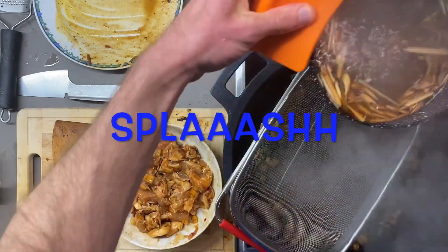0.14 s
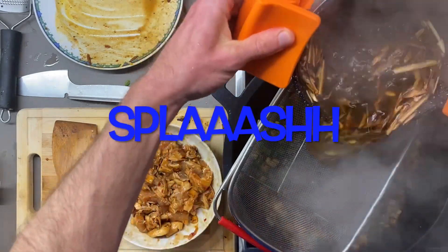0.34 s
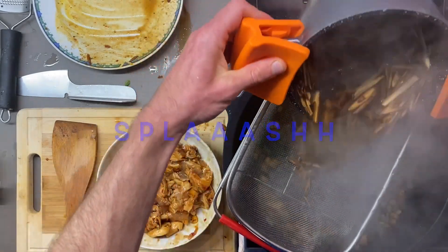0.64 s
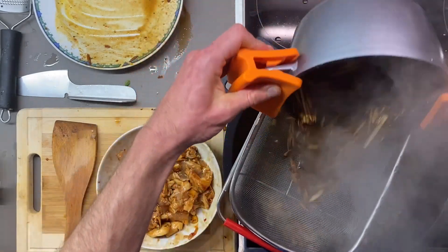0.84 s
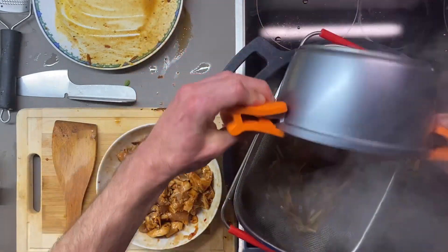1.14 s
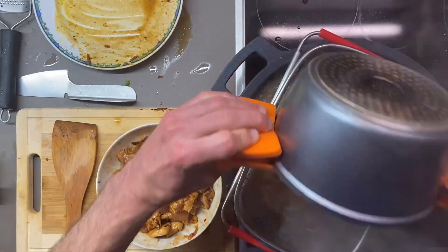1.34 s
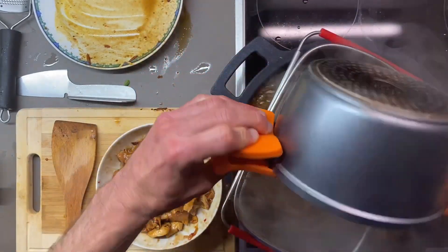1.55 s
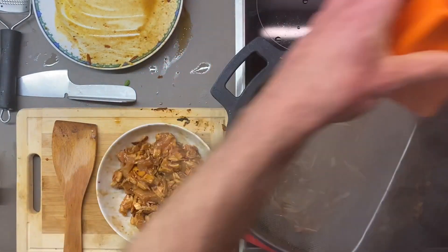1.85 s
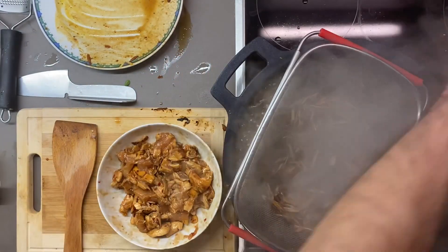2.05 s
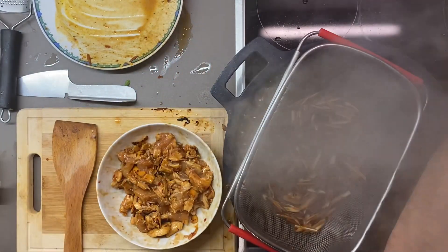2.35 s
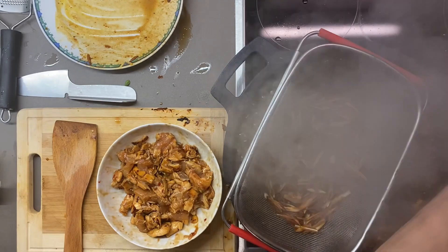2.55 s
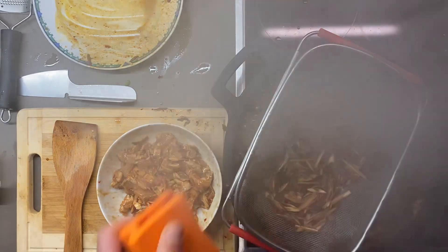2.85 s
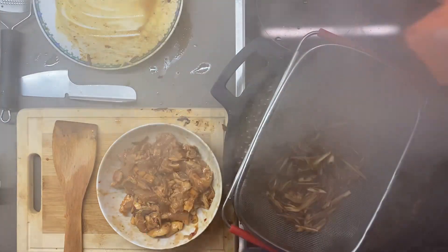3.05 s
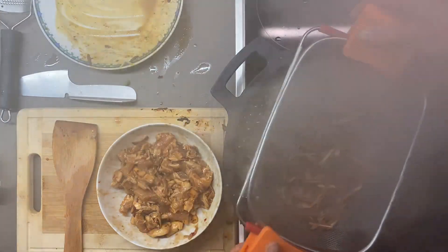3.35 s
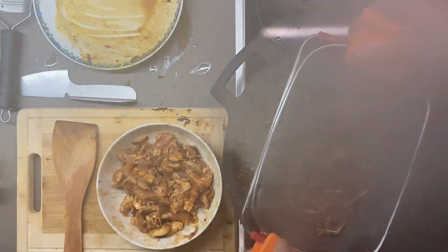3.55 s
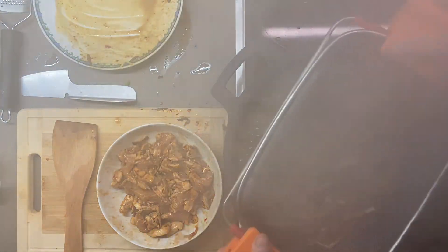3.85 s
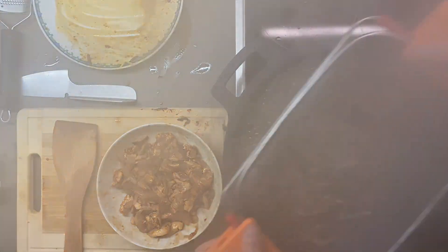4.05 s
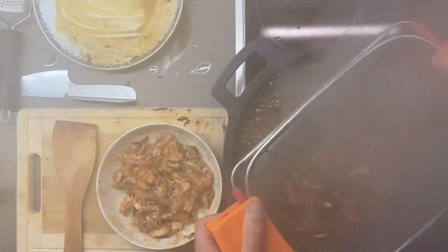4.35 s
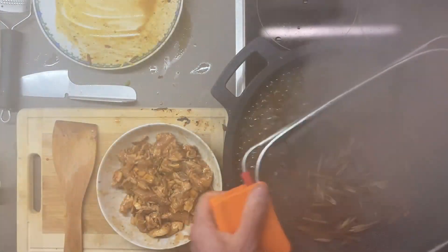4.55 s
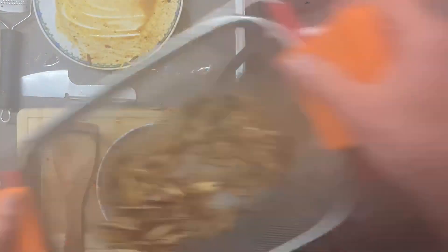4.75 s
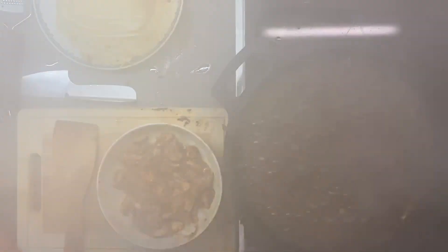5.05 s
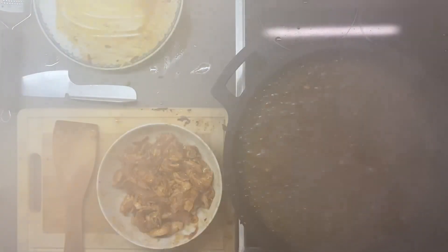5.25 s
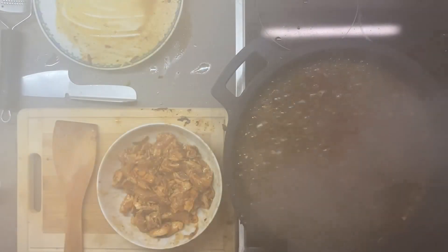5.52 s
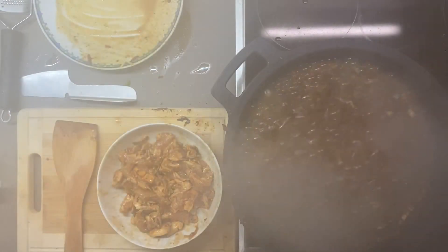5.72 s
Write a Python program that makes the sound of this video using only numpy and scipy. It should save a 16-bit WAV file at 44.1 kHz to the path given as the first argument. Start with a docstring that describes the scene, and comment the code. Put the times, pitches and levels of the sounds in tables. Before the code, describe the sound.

From 0 s a fierce, dense, bright sizzle fills the close stereo sound as broth is poured through a wire strainer onto very hot metal. Around 1-2 s it falls away rapidly, passing through a busy mid-pitched seethe of small bubbles into a darker rolling boil over a low rumble, with thin crackle from the rim and a faint steady hiss. At 2.4 s the empty pot lands on the worktop with a short dry crack and a dull boom that hardly rings. The boil slowly builds, with irregular round bubble pops and sharp spits; a soft low bump comes at 3.35 s. Around 5.2 s the draining strainer briefly livens the seething and clinks. At 5.5 s it hits the pot with a hollow clang and worktop thud, then bounces with bright mesh rattles around 5.65-5.8 s, ringing briefly over the continuing boil. Kitchen reflections are short.

```python
"""A fierce sizzle comes first, then dies down to a rolling boil: broth is poured through a wire strainer
into a very hot pan and fills it. The empty pot knocks onto the worktop; later the strainer is dropped
onto it, clattering and bouncing. Swarms of bubbles and patchy noise make the sizzle and the boil;
noise bursts and dying modes make the blows. The place is a kitchen; a two-port microphone is close by."""
import sys
import numpy as np
from scipy import signal
from scipy.fft import rfft, irfft
from scipy.io import wavfile
from scipy.ndimage import uniform_filter1d

SR = 44100
rng = np.random.default_rng(int(sys.argv[2]) if len(sys.argv) > 2 else 0)


def int16_out(signal):
    """Quantize to a 16-bit WAV file."""
    q = np.round(np.clip(np.atleast_2d(signal).T, -1, 1) * 32767)
    wavfile.write(sys.argv[1], SR, q.astype(np.int16))


N = 259352
HZ = np.fft.rfftfreq(N, 1 / SR)
TIME = np.arange(N) / SR

# Source levels in dB are relative: room, mix and microphone come after them.

# colouring of each source before the microphone: (frequency [Hz], gain [dB])
FIZZ_COLOUR = [(1500, -26), (3000, -2.5), (5000, 4.5), (6400, -2), (8000, 2), (10000, 0.5), (12000, -0.5),
               (14000, -1), (16000, -7.5)]
SPATTER_COLOUR = [(500, -23), (1000, -9), (1800, 0.5), (3000, 4.5), (4300, -1), (5500, 0), (6500, 2),
                  (10000, -65)]
BOIL_COLOUR = [(130, -22), (185, -20.5), (230, -5), (300, 0), (370, -3), (450, -7), (600, -3.5),
               (820, -6.5), (1100, -5.5), (1500, -10.5), (2100, -20), (3200, -20), (6000, -24.5)]
SEETHE_COLOUR = [(500, -6.5), (900, -10.5), (1400, -2), (2000, -5.5), (2500, -4), (3300, -35), (6000, -29)]
RUMBLE_COLOUR = [(15, -26), (30, -13), (48, -1.5), (70, -2), (95, 1), (125, -1), (175, -10.5), (300, -5.5),
                 (500, -18), (1500, -78)]
KNOCK_COLOUR = [(150, -7), (230, -2), (400, -4), (620, 1), (820, -4), (1000, -2), (1400, -10), (1750, -5),
                (2150, -7), (2350, -14), (2600, -12), (3500, -20), (4600, -16), (5300, -18), (6500, -26),
                (11000, -26), (15000, -33)]
# standing waves between hob, hood and wall, which colour the boil:
# (frequency [Hz], half width [Hz], gain [dB])
NOOK_RESONANCES = [(227, 8.4, 5), (257, 11, -7.5), (296, 3.6, 6.5), (345, 6.6, 6.5), (384, 21, -2),
                   (395, 8.4, 5.5), (467, 33, 6), (553, 19, -2.5), (652, 28, -6.5), (857, 123, 6),
                   (940, 33, -9), (1045, 82, 3)]
# the loudest single bubbles bursting: (time [s], level [dB], pitch [Hz])
BUBBLES = [(1.64, -33, 1070), (2.09, -27.5, 840), (2.661, -33, 890), (3.164, -28, 770), (3.408, -32, 700),
           (3.645, -30, 1040), (4.025, -25.5, 860), (4.092, -33, 1130), (4.527, -31, 890),
           (5.017, -30, 1010), (5.378, -24, 860), (5.416, -21, 1085)]
# the loudest drops spitting: (time [s], level [dB], pitch [Hz])
SPITS = [(2.511, -25, 11000), (2.7598, -28.5, 2220), (2.8345, -36, 9100), (2.9846, -39, 9690),
         (3.176, -30, 2150), (3.277, -27, 3070), (3.317, -32, 10300), (3.3478, -27.5, 10000),
         (3.697, -24.5, 1700), (3.7873, -35, 10600), (4.025, -44, 2600), (4.165, -31, 4800),
         (4.218, -31, 1460), (4.5445, -27, 1820), (5.0362, -29, 1460), (5.1437, -35, 10800)]
# lesser chance pops in the covered pan: (rate [1/s], level [dB], lowest pitch [Hz], highest pitch [Hz])
STRAY_POPS = [(6, -35, 520, 1200), (7, -38, 1200, 2500)]
# the strainer clinks, lands on the pot edge after edge and bounces; each contact favours one mode:
# (time [s], chatter level [dB], brightest frequency [Hz], width [octaves], chatter time [s],
#  hollowness [0-1], pot ring level [dB], strainer ring level [dB], favoured mode [Hz], favour [dB])
CLASHES = [(5.2276, -17, 4450, 0.96, 0.009, 0, -55, -20, 5400, 3),
           (5.237, -22.5, 4500, 1, 0.0083, 0, -55, -31, 2680, 14),
           (5.4746, -24.5, 4420, 0.45, 0.012, 0.5, -28.5, -48, 4005, 13),
           (5.493, -25.5, 1500, 1.7, 0.016, 0.4, -34, -55, 5244, -4),
           (5.514, -21, 3400, 1.2, 0.018, 0.9, -20.5, -42, 2932, 7),
           (5.531, -20, 5300, 1.2, 0.015, 0.4, -24.5, -42, 1077, 9),
           (5.646, -31.5, 1530, 1.6, 0.026, 0.4, -56, -58, 1077, 5),
           (5.6715, -18.5, 3830, 1.8, 0.0086, 0.1, -27, -28, 749, 15),
           (5.687, -21, 9000, 1.6, 0.0078, 0.3, -30, -25, 12400, 6),
           (5.706, -25.5, 3500, 1.1, 0.015, 0.6, -37, -50, 2885, 10),
           (5.785, -36, 3600, 1.3, 0.016, 0.5, -31.5, -48, 4005, 4),
           (5.803, -24.5, 4060, 0.89, 0.0095, 0.5, -29.5, -41, 4790, 2)]
# blows and soft bumps that shake the worktop; each spot favours one note of the board:
# (time [s], level [dB], first contact time [s], change per contact [dB], first gap [s], favoured note [Hz])
THUDS = [(2.4114, -33, 0.001, 6.5, 0.0027, 589), (2.4178, -15, 0.0049, -2.5, 0.0074, 124),
         (2.445, -19, 0.007, -3, 0.026, 90), (3.348, -19, 0.015, 3.5, 0.041, 52),
         (5.2388, -21.5, 0.0055, -2, 0.026, 90), (5.4913, -10.5, 0.0023, -1, 0.011, 399),
         (5.527, -26, 0.00058, -2, 0.0075, 397), (5.538, -14, 0.0053, -5, 0.0114, 90),
         (5.651, -18, 0.0033, 2.5, 0.0105, 90), (5.692, -24.5, 0.0026, 2.5, 0.011, 216),
         (5.7457, -21.5, 0.0048, -2, 0.0092, 215), (5.787, -31, 0.0042, 0, 0.011, 216)]
# modes of what rings: (frequency [Hz], level [dB], time to die by 60 dB [s])
POT_MODES = [(749, -9, .3), (1077, -8.5, .3), (1130, -13, .12), (1630, -8, .15), (1682, -8, .16),
             (1892, -3.5, .17), (2215, -8, .16), (2640, -7, .11), (2670, -8, .12), (2837, -5, .15),
             (2885, -5, .12), (2932, -5.5, .12), (3108, -5, .14), (4005, -6.5, .11), (4409, -7, .12),
             (4648, -6, .12), (4790, -6, .11), (4845, -8, .14), (5244, -1.5, .16), (5330, -6, .11),
             (5420, -6, .11), (5520, -5, .12), (5740, -9, .14)]
STRAINER_MODES = [(2165, -6, .08), (2385, -13, .3), (2465, -4, .07), (2680, -2.5, .06), (2945, -1.5, .06),
                  (3180, -7, .15), (3248, -10, .24), (3340, -2, .07), (3825, -7, .08), (4172, -13, .22),
                  (4950, -2, .08), (5200, -8, .1), (5265, -14, .25), (5400, -5, .07), (8050, -1, .07),
                  (8870, -3, .07), (11070, -6, .08), (12400, -4, .08)]
WORKTOP_MODES = [(52, -20, .28), (90, -5, .12), (104, -5, .1), (124, -2.5, .13), (146, -8, .08),
                 (170, -7, .08), (188, -8, .08), (216, -4, .17), (232, -7, .12), (285, -10, .06),
                 (351, -8.5, .12), (399, -7, .11), (444, -9, .13), (589, -16, .13), (675, -17, .12),
                 (942, -17, .12)]
# kitchen reverberation: (frequency [Hz], time to die by 60 dB [s])
KITCHEN_DECAY = [(100, 0.74), (500, 0.51), (2000, 0.35), (6000, 0.39), (15000, 0.26)]
# microphone, phase lead of the left port over the right: (frequency [Hz], phase [rad])
PORT_PHASE = [(300, 0), (700, -.45), (1050, 0), (2000, 0), (2700, .85), (4300, .85), (4900, .15),
              (5400, .35), (6000, 1.5), (6450, 2.7), (7200, 3.14), (7900, 3.35), (9800, 6.15), (11000, 6.4),
              (12800, 9.1), (13600, 9.42), (14300, 9.65), (15500, 12.3)]
# microphone, gain of the sound the ports do not share: (frequency [Hz], gain [dB])
UNSHARED_GAIN = [(60, -51), (130, -22.5), (290, -15), (640, -10.5), (1400, -6.5), (3000, -6.5), (5000, -8),
                 (6000, -9), (7000, -115), (9000, -45), (15000, -19)]
# microphone, left port over right: (frequency [Hz], difference [dB])
PORT_BALANCE = [(200, 0), (380, -0.96), (700, 2), (1300, 0.1), (2400, -1.4), (4400, -1), (8000, -0.1)]
# microphone response: (frequency [Hz], half width [Hz], gain [dB])
PORT_RESONANCES = [(5150, 590, 2.5), (7220, 1110, -10.5), (8310, 350, 8)]

# top of the microphone's band
EDGE_HZ = 15900
# half of the hot metal is covered at COVERED_S; the liquid spreads over a time scale of SPREAD_S
COVERED_S, SPREAD_S = 1.348, 0.29
# fine fizz and coarser spatter on the bare pan; spatter follows a power of the bare share
FIZZ_DB, SPATTER_DB, SPATTER_POWER = -31.5, -36.5, 1
# droplets frying at the rim: settled level, extra while hot, cooling time, spatter over fizz
RIM_DB, RIM_HOT_DB, RIM_COOL_S, RIM_SPATTER_DB = -61.5, 10, 2.1, 4
# boil and rumble: level in the covered pan, change while it is bare; the boil keeps building as it heats
BOIL_DB, BOIL_BARE_DB, BOIL_DB_PER_S = -40, -4.5, 0.6
RUMBLE_DB, RUMBLE_BARE_DB = -42.0, -6.5
# seething: level in deep liquid, lift while the pan is half covered
SEETHE_DB, SEETHE_SHALLOW_DB = -49, 9.5
# the lifted strainer drains into the pan: middle, half length, lift of the seething, lift at the rim
DRAIN_S, DRAIN_HALF_S, DRAIN_SEETHE_DB, DRAIN_RIM_DB = 5.2, 0.27, 2.5, 2
# ringing metal: scatter of pitch per contact (share), depth of flutter (share), time between chance values
DETUNE, BUZZ_DEPTH, BUZZ_S = 0.003, 0.7, 0.005
# the chatter breaks up into small, uneven touches
SCRAPE_DB = 2.5
# how strongly a spot favours a worktop note, and how wide any favoured band is
FAVOUR_DB, FAVOUR_WIDTH_HZ = 4, 25
# the pot rocks after a blow: factors by which, at each contact, the gap shrinks and the contact lengthens
ROCK_SHRINK, ROCK_SOFTEN = 0.787, 1.14
# the pot is put down with a dry crack: time, level, rise, time its base chatters, decay, chatter rate
KNOCK_S, KNOCK_DB, KNOCK_RISE_S, KNOCK_HOLD_S = 2.4103, -18.5, 0.0014, 0.0042
KNOCK_DIE_S, KNOCK_PER_S = 0.011, 520


def sizzle():
    """Tiny steam bubbles on bare metal; as the pan cools they thin out into separate crackles."""
    heat = np.hypot(amp(FIZZ_DB) * bare(), rim())
    spatter_gain = np.hypot(amp(SPATTER_DB) * bare() ** SPATTER_POWER, amp(RIM_SPATTER_DB) * rim())
    fizz = swarm(3050, 14400, 9000, 0.86, spread_db=2.5) + amp(12.) * steam(patchy_db=0.4)
    fizz = coloured(fizz, FIZZ_COLOUR)
    spatter = swarm(900, 7000, 4000, 2., spread_db=3.2) + amp(3.) * steam(patchy_db=1.6)
    spatter = coloured(spatter, SPATTER_COLOUR)
    crackle = coloured(swarm(2500, 14000, 160, 1., spread_db=4.3), FIZZ_COLOUR)
    # the root lets the crackles fade more slowly than the fizz
    frying = amp(3.5) * heat * fizz + amp(1.93) * spatter_gain * spatter
    return room(frying + amp(-33.5) * np.sqrt(heat) * crackle, wet_db=-10.0)


def bare():
    """Share of the hot metal that the liquid has not yet covered, over time."""
    return 1 / (1 + np.exp((TIME - COVERED_S) / SPREAD_S))


def rim():
    """Gain of the frying at the rim, which cools once the pan is covered."""
    hot = np.exp(-np.maximum(TIME - COVERED_S, 0) / RIM_COOL_S)
    return amp(RIM_DB + RIM_HOT_DB * hot + DRAIN_RIM_DB * draining())


def draining():
    """Flow from the lifted strainer, 0-1 over time."""
    return np.exp(-((TIME - DRAIN_S) / DRAIN_HALF_S) ** 2)


def boil():
    """Larger bubbles burst all over the deepening liquid, above a low rumble."""
    froth = swarm(201.4, 4304, 1900, 2.82, spread_db=3.) + amp(-6.0) * steam(patchy_db=3.5)
    froth = irfft(rfft(room(froth, wet_db=-5.5)) * amp(bumps(NOOK_RESONANCES)), N)
    rumble = coloured(rng.standard_normal((2, N)), RUMBLE_COLOUR)
    strength = amp(BOIL_DB + BOIL_BARE_DB * bare() + BOIL_DB_PER_S * TIME)
    rumble_strength = amp(RUMBLE_DB + RUMBLE_BARE_DB * bare())
    return strength * coloured(froth, BOIL_COLOUR) + rumble_strength * rumble


def seethe(surge_db=1.0):
    """A thin layer of liquid boils in small, high bubbles, which give way to big ones as it deepens."""
    froth = swarm(700, 4500, 1100, 3.5, spread_db=3.6) + amp(-6.) * steam(patchy_db=2.5)
    # the bubbles break in clusters
    surge = amp(surge_db * unit(uniform_filter1d(rng.standard_normal(N), size=1800)))
    # 1 when half of the pan is covered, 0 when it is bare or full
    shallow = 1 - (2 * bare() - 1) ** 2
    strength = amp(SEETHE_DB + SEETHE_SHALLOW_DB * shallow + DRAIN_SEETHE_DB * draining())
    return strength * coloured(room(surge * froth, wet_db=0.0), SEETHE_COLOUR)


def pops():
    """Big bubbles and spitting drops: the film snaps as the cavity rings; a spit has more and longer spray."""
    out, t = np.zeros((2, N)), TIME[:SR // 25]
    # (rows, snap over ring [dB], snap decay [s], ring [cycles]); stray bubbles blip for longer
    kinds = ((BUBBLES, -17.5, 0.0039, 3.3),
             (SPITS, -12, 0.0074, 2.1),
             (stray_pops(), -16, 0.003, 7))
    for rows, snap_db, snap_s, cycles in kinds:
        for s, db, hz in rows:
            band = signal.butter(1, [hz, min(2 * hz, EDGE_HZ)], "band", fs=SR)
            snap = unit(signal.lfilter(*band, rng.standard_normal(len(t)))) * np.exp(-t / snap_s)
            add(out[0], s, amp(db + snap_db) * snap)
            add(out[0], s, amp(db) * bubble(hz, cycles))
    return room(out, wet_db=-5.0)


def stray_pops():
    """Rows (time [s], level [dB], pitch [Hz]) of chance pops in the covered pan."""
    span = N / SR - COVERED_S
    rows = []
    for per_s, db, low_hz, high_hz in STRAY_POPS:
        for when, pitch in rng.random(size=(40, 2))[:round(per_s * span)]:
            rows.append((COVERED_S + span * when, db, low_hz * (high_hz / low_hz) ** pitch))
    return rows


def clashes(die_s=0.011, treble_slope=0.93, mesh_db=3.5, shiver_db=-30.0, shiver_s=0.032,
            wall_width_hz=34.0, valley=0.17):
    """Rim and wire mesh chatter briefly at each contact and set pot and strainer ringing."""
    out, t = np.zeros((2, N)), TIME[:SR // 4]
    hz = np.fft.rfftfreq(len(t), 1 / SR) + 1
    # chatter on the pot sounds hollow: it comes out through the wall's resonances, which merge in the treble
    peaks = sum(1 / (1 + ((hz - mode[0]) / wall_width_hz) ** 2) for mode in POT_MODES)
    wall = np.sqrt(valley * (1 + (hz / 6000) ** 4) / (1 + (hz / 9000) ** 4) + peaks)
    for (s, db, bright_hz, octaves, chatter_s, hollow,
         pot_db, strainer_db, note_hz, note_db) in CLASHES:
        hump = np.exp(-(np.log2(hz / bright_hz) / octaves) ** 2 / 2)
        treble = (hz > bright_hz) * (bright_hz / hz) ** treble_slope
        shape = np.maximum(hump, treble) * wall ** np.clip(hollow, 0, 1)
        # crowded resonances of the wires, different at each contact point
        shape = shape * amp(mesh_db * unit(uniform_filter1d(rng.standard_normal(len(hz)), size=30)))
        scrape = amp(SCRAPE_DB * unit(uniform_filter1d(rng.standard_normal(len(t)), size=70)))
        mesh = unit(irfft(rfft(scrape * rng.standard_normal((2, len(t)))) * shape, len(t)))
        # the chatter sags a little while in contact, then dies; a faint shiver lasts longer
        contact = np.exp(-np.maximum(t - chatter_s, 0) / die_s - 0.15 * np.minimum(t / chatter_s, 1))
        add(out, s, amp(db) * mesh * (contact + amp(shiver_db) * np.exp(-t / shiver_s)))
        for modes, ring_db in ((POT_MODES, pot_db), (STRAINER_MODES, strainer_db)):
            phase = 2 * np.pi * rng.random((2, len(modes), 1))
            # the grip of the contact detunes each mode a little
            detuned = np.array(modes, float)
            detuned[:, 0] *= 1 + DETUNE * rng.standard_normal(len(modes))
            gain = favour(modes, note_hz, note_db) * buzz(len(modes), BUZZ_DEPTH, BUZZ_S)
            onset = 1 - np.exp(-t / 0.00038)
            add(out, s, amp(ring_db) * ring(detuned, t, phase, gain) * onset)
    return room(out, wet_db=-9.5)


def buzz(count, depth, hold_s):
    """Loose parts keep touching the ringing metal, so each of its modes flutters in strength."""
    knots = rng.standard_normal((count, 600))
    at = TIME[:SR // 4] / hold_s
    flutter = np.array([np.interp(at, np.arange(len(row)), row) for row in knots])
    return (1 + depth * flutter) / np.hypot(1, depth)


def knock(rattle=0.91):
    """The pot's base chatters flat onto the worktop: a dense crack of noise that hardly rings."""
    out, t = np.zeros((2, N)), TIME[:SR // 5]
    crack = coloured(rng.standard_normal((2, N)), KNOCK_COLOUR)[:, :len(t)]
    envelope = np.minimum(t / KNOCK_RISE_S, 1) * np.exp(-np.maximum(t - KNOCK_HOLD_S, 0) / KNOCK_DIE_S)
    chatter = 1 - rattle * np.cos(2 * np.pi * KNOCK_PER_S * t)
    add(out, KNOCK_S, amp(KNOCK_DB) * crack * envelope * chatter)
    return room(out, wet_db=-10.0)


def thuds(count=3):
    """The worktop booms as the pot rocks after each blow; a longer contact leaves only the low modes."""
    boom = np.zeros(N)
    for s, db, contact_s, step_db, gap_s, note_hz in THUDS:
        # the air follows the board's velocity, so each mode starts at its crest
        gain = favour(WORKTOP_MODES, note_hz, FAVOUR_DB)
        board = ring(WORKTOP_MODES, TIME[:SR // 2], np.pi / 2, gain)
        for k in range(count):
            push = np.hanning(int(contact_s * ROCK_SOFTEN ** k * SR) + 3)
            add(boom, s, amp(db + k * step_db) * signal.fftconvolve(board, push / push.sum()))
            s += gap_s * ROCK_SHRINK ** k
    return amp(-3.5) * room(np.array([boom, .5 * boom]), wet_db=-13.0)


def hiss(hz=4830.0, width_hz=110.0, db=-58.5):
    """A thin, steady hiss in the background: noise through one narrow resonance."""
    band = 1 + ((HZ - hz) / width_hz) ** 2
    return amp(db) * unit(irfft(rfft(rng.standard_normal((2, N))) / band, N))


def bubble(hz, cycles, rise=0.1):
    """A bubble rings for a few cycles, its pitch rising as it opens."""
    turns = np.arange(int(5 * cycles * SR / hz) + 2) * hz / SR
    return np.sin(2 * np.pi * turns * (1 + rise * turns / cycles / 2)) * np.exp(-turns / cycles)


def swarm(low_hz, high_hz, per_s, cycles, spread_db, count=36):
    """Countless bubbles in a range of sizes, a few far louder than the rest."""
    out = np.zeros((2, N))
    for hz in np.geomspace(low_hz, min(high_hz, .4 * SR), count):
        chances = rng.random((4000, 5))[:int(per_s * N / SR / count)]
        when, loud, flip, place, detune = chances.T
        height = amp(spread_db * np.minimum(-np.log(loud + 1e-9), 4.5)) * np.sign(flip - .5)
        # all bubbles of one size share a pitch
        ringing = bubble(hz * (.95 + .1 * detune[0]), cycles)
        at = (when * N).astype(int)[:, None] + np.arange(len(ringing))
        # each bubble's place sets its part in the unshared row
        unshared = height * np.sqrt(3) * (2 * place - 1)
        for row, weight in zip(out, (height, unshared)):
            row += hz * np.bincount(at.ravel(), (weight[:, None] * ringing).ravel(), N)[:N]
    return unit(out)


def steam(patchy_db):
    """Smooth hiss of escaping vapour, drifting in patches of time and pitch."""
    z = signal.stft(rng.standard_normal((2, N)), nperseg=512)[2]
    patches = uniform_filter1d(rng.standard_normal(z.shape[1:]), size=9, axis=0)
    patches = unit(uniform_filter1d(patches, size=10, axis=1))
    return unit(signal.istft(z * amp(patchy_db * patches))[1][:, :N])


def ring(modes, t, phase, gain):
    """A struck body sounds as the sum of its dying modes."""
    hz, db, t60 = np.transpose(modes)[:, :, None]
    decay = np.exp(-np.log(1000) * t / t60)
    return (gain * amp(db) * decay * np.sin(2 * np.pi * hz * t + phase)).sum(-2)


def favour(modes, hz, db):
    """Gain of each mode when the contact point favours the one near hz."""
    return amp(db * np.exp(-((np.array(modes)[:, :1] - hz) / FAVOUR_WIDTH_HZ) ** 2))


def room(x, wet_db, size=22):
    """Direct sound plus dense kitchen reflections; rows: what both ports share, and what they do not."""
    count = SR // 2 // size
    taps = np.zeros((2, SR // 2 + 200))
    # one reflection of random sign in every slot of size samples, after a short delay
    at = 150 + np.arange(count) * size + rng.integers(0, size, (2, count))
    np.put_along_axis(taps, at, rng.choice([-1., 1.], at.shape), 1)
    hz, t, z = signal.stft(taps, SR, nperseg=256)
    decay = np.exp(-np.log(1000) * t / read(KITCHEN_DECAY, hz)[:, None])
    tail = signal.istft(z * decay, SR)[1]
    wet = signal.fftconvolve(x[:1], tail / np.linalg.norm(tail[0]), axes=1)[:, :N]
    return x + amp(wet_db) * wet


def bumps(resonances):
    """A response in dB, made of bell-shaped peaks and dips."""
    return sum(db / (1 + ((HZ - hz) / width) ** 2) for hz, width, db in resonances)


def coloured(x, spectrum):
    """Filters x by a table of gains, then scales to rms 1."""
    return unit(irfft(rfft(x) * amp(read(spectrum, HZ)), N))


def read(points, hz):
    """Reads a table on a logarithmic frequency axis."""
    f, value = np.transpose(points)
    return np.interp(np.log(hz + 1), np.log(f + 1), value)


def add(mix, s, sound):
    """Mixes a sound in at time s."""
    part = mix[..., round(s * SR):][..., :sound.shape[-1]]
    part += sound[..., :part.shape[-1]]


def amp(db):
    """Decibels to gain."""
    return 10 ** (np.asarray(db) / 20)


def unit(x):
    """Scales to rms 1."""
    return x / np.sqrt(np.mean(x ** 2) + 1e-20)


def scene():
    """All sources at the two ports: bass alike, the middle range partly unrelated."""
    sources = sizzle() + hiss() + seethe() + boil() + pops() + thuds() + knock() + clashes()
    shared, unshared = rfft(sources)
    side = amp(read(UNSHARED_GAIN, HZ))
    ports = np.array([shared + side * unshared, shared - side * unshared])
    return irfft(ports / np.sqrt(1 + side ** 2), N)


def record(dry, low_cut_hz=38.7, ceiling=1.0):
    """The ports resonate and turn the treble's phase apart; high peaks saturate; then the band limits."""
    phase = np.interp(HZ, *np.transpose(PORT_PHASE))
    # each port takes half of the difference between them
    sides = np.array([[.5], [-.5]])
    colour = amp(bumps(PORT_RESONANCES) + sides * read(PORT_BALANCE, HZ))
    heard = irfft(rfft(dry) * colour * np.exp(1j * sides * phase), N)
    heard = signal.sosfilt(signal.butter(4, low_cut_hz, "high", fs=SR, output="sos"), heard)
    heard = heard / (1 + (heard / ceiling) ** 4) ** .25
    low_pass = signal.firwin(511, EDGE_HZ, window=("kaiser", 9), fs=SR)
    return signal.oaconvolve(heard, low_pass[None], "same")


dry = scene()
out = record(dry)
int16_out(out)
```